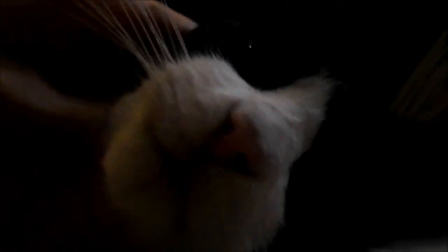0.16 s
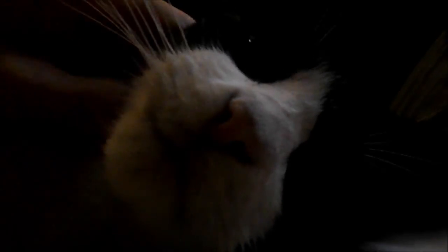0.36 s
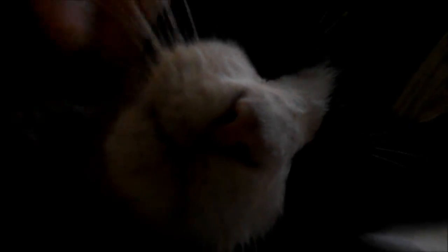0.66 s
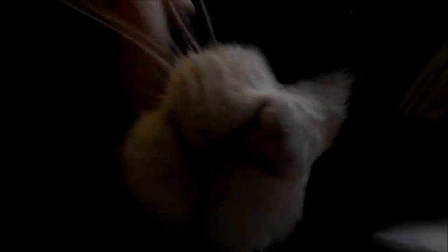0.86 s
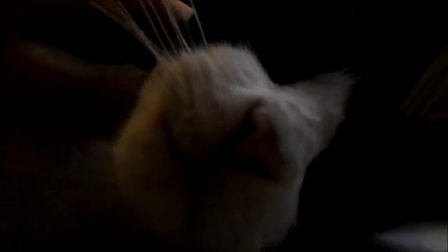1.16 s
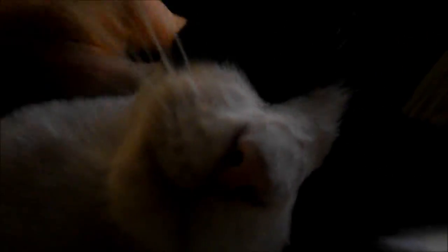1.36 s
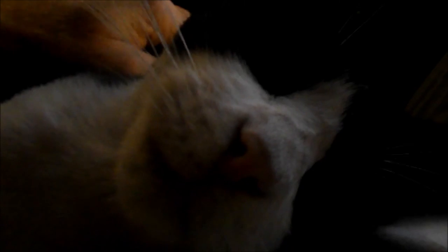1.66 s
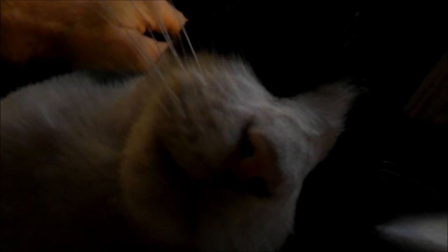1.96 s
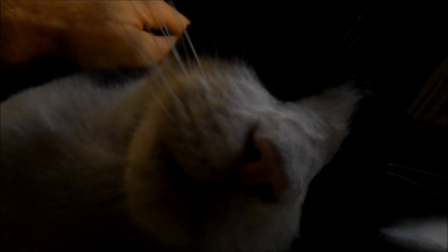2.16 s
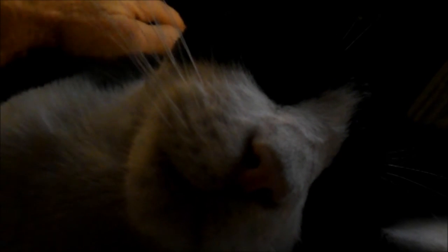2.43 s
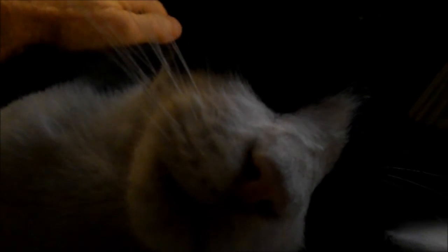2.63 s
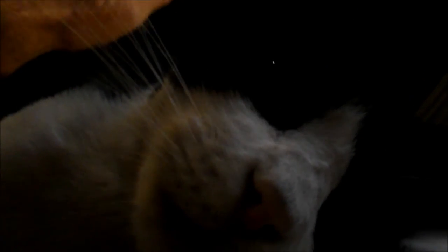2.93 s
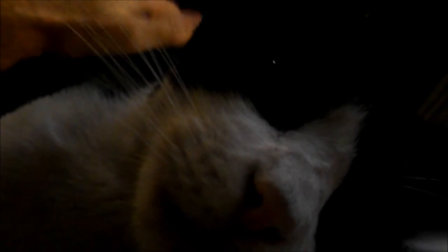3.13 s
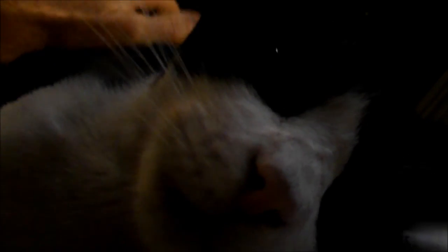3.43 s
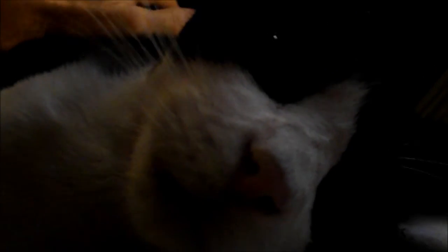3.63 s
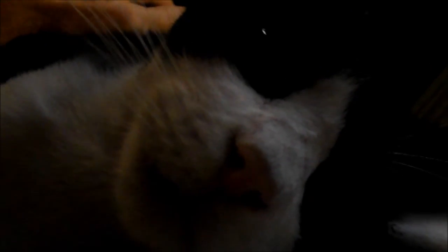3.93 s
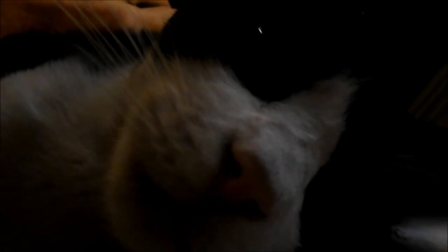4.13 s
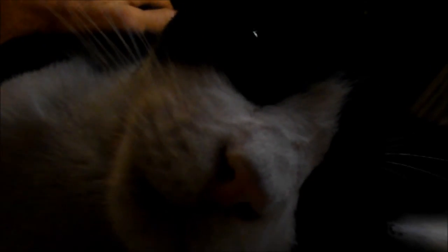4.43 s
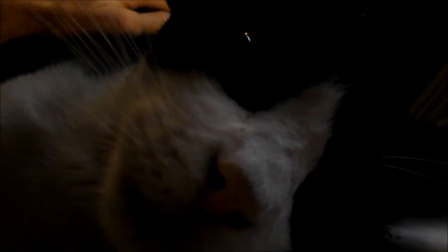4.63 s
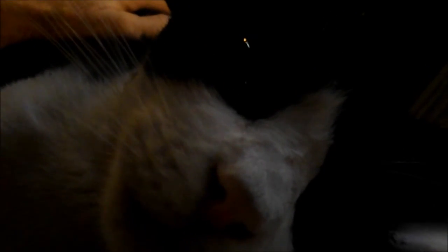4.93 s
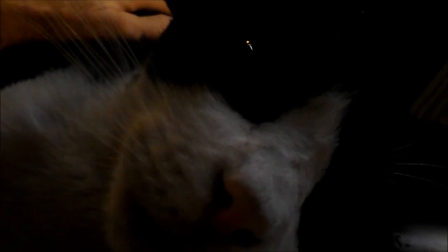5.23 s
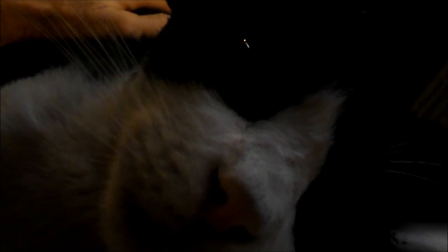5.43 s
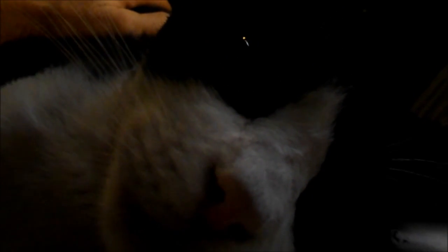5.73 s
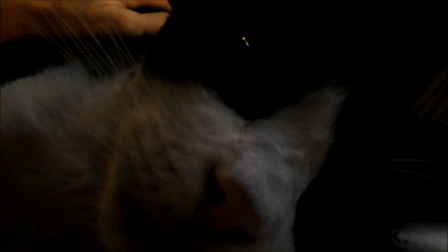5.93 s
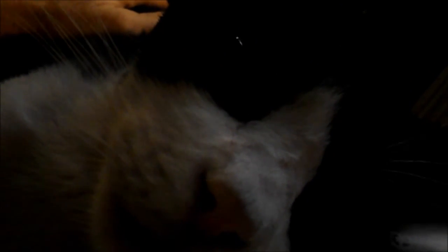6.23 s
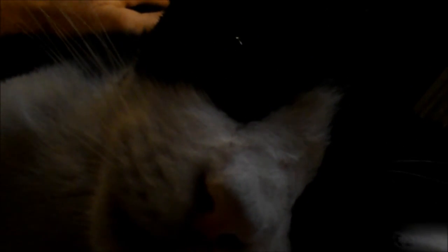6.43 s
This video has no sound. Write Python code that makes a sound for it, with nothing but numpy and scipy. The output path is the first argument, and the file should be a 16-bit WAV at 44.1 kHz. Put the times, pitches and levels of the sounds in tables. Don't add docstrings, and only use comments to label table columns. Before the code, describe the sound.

Steady purring from a relaxed cat, heard up close and dry. It starts at the end of an out-breath, then cycles between inhaling and exhaling, roughly one full breath every two seconds. Each change of direction brings a short burst of hard, ticking throat pulses, followed by a softer, uneven flutter with breathy fizz that dies down. The indoor background is only a low hum and soft hiss, recorded in mono.

```python
import sys
import numpy as np
from scipy import signal
from scipy.fft import rfft, irfft
from scipy.io import wavfile
from scipy.ndimage import uniform_filter1d

SR = 44100
rng = np.random.default_rng(int(sys.argv[2]) if len(sys.argv) > 2 else 0)


def pcm_store(signal):
    levels = np.round(np.clip(np.atleast_2d(signal), -1, 1) * 32767)
    wavfile.write(sys.argv[1], SR, levels.astype(np.int16).T)


def voltage_ratio(decibels):
    exponent = np.asarray(decibels, float) / 20
    return 10 ** exponent


N = 290574

# first puff in seconds, last puff in seconds, number of puffs,
# open share of the cycle (0-1).
RUNS = [
    (.010, .133, 4, .55),
    (.441, .523, 3, .35),
    (1.113, 1.807, 18, .65),
    (2.155, 2.237, 3, .3),
    (2.924, 3.614, 18, .65),
    (3.885, 4.020, 4, .22),
    (4.196, 4.236, 2, .2),
    (4.704, 5.528, 21, .65),
    (5.790, 6.046, 7, .4),
    (6.514, 6.594, 3, .55),
]
# hiss in dB at first and last,
# palate share in dB, rumble in dB at first and last.
FLOW = [(-62, -65.5, -4.5, -47, -61), (-65, -59, 1.5, -55, -60.5), (-63, -63, -3, -49.5, -58),
        (-58.5, -56.5, -8, -52, -53), (-60, -63.5, -15, -53, -59.5), (-63, -52, -14, -58.5, -51),
        (-57.5, -73, -5, -52, -63), (-62, -63.5, -8.5, -48, -61.5), (-54, -61.5, -12, -53.5, -64.5),
        (-60, -53, -17, -50, -49)]
# frequency in Hz, width in Hz, level in dB.
THROAT = [(221.4, 43, -3.5), (357, 340, -1.5), (541.7, 88, 2.5), (923, 170, -0.5), (1610, 740, -10)]
CLOSING_MS = (0.13, 0.11)


def rms_one(x):
    return x / np.sqrt(np.mean(x ** 2) + 1e-20)


def resonate(x, modes):
    out = 0
    for hz, width_hz, level_db in modes:
        r = np.exp(-np.pi * width_hz / SR)
        b = [(1 - r * r) / 2, 0, (r * r - 1) / 2]
        a = [1, -2 * r * np.cos(2 * np.pi * hz / SR), r * r]
        out = out + voltage_ratio(level_db) * signal.lfilter(b, a, x + 1e-18)
    return out


def add(track, sound, s, level_db):
    at = round(s * SR)
    part = sound[:N - at]
    track[at:at + len(part)] += part * voltage_ratio(level_db) / np.abs(sound).max()


def inward(s):
    turns = [
        .2,
        .9,
        1.87,
        2.6,
        3.7,
        4.4,
        5.54,
        6.4,
    ]
    return np.searchsorted(turns, s) % 2


def room():
    # frequency in Hz, density in dB per Hz.
    floor = [(20, -23), (40, -16), (70, -10.5), (90, -13.5), (140, -8.5), (220, -2), (330, -8), (450, -8),
             (680, -15), (1500, -19), (2300, -21.5), (6000, -19.5), (9700, -21.5), (11500, -22.5)]
    # frequency in Hz, wander in Hz, rms level in dB.
    hum = [(54, 1.8, -70.5), (117.7, 4.7, -70)]
    floor_hz, floor_db = np.transpose(floor)
    hz = np.maximum(np.fft.rfftfreq(N, 1 / SR), 10)
    shape = voltage_ratio(np.interp(np.log(hz), np.log(floor_hz), floor_db))
    out = voltage_ratio(-54.5) * rms_one(irfft(rfft(rng.standard_normal(N)) * shape, N))
    for hum_hz, wander_hz, level_db in hum:
        pitch, swell = (rms_one(uniform_filter1d(uniform_filter1d(n, size=2000), size=2000))
                        for n in rng.standard_normal((2, N)))
        tone = np.sin(2 * np.pi * np.cumsum(hum_hz + wander_hz * pitch) / SR)
        out += voltage_ratio(level_db) * rms_one(voltage_ratio(swell) * tone)
    return out


def opening():
    out, t = np.zeros(N), np.arange(N) / SR
    for first, last, puffs, share in RUNS:
        cycle = (t - first) * (puffs - 1) / (last - first)
        number = np.clip(np.round(cycle).astype(int), 0, puffs - 1)
        size, shift = rng.standard_normal((puffs, 2))[number].T
        along = np.clip((cycle - number + .04 * shift) / share + .54, 0, 1)
        out += np.sin(np.pi * along ** 1.4) * voltage_ratio(1.5 * size)
    return out


def flow_in_time():
    rise_db_per_s, fall_db_per_s = (250, 65), 260
    arch_db, palate_fade_db_per_s = 4.5, 11.5
    t = np.arange(N) / SR
    ends = np.array(RUNS)[:, :2].ravel()
    flow = np.array(FLOW)
    rumble = arch = 0
    for (first, last), (first_db, last_db) in zip(ends.reshape(-1, 2), flow[:, 3:]):
        before_db = rise_db_per_s[inward(first)] * np.maximum(first - t, 0)
        after_db = fall_db_per_s * np.maximum(t - last, 0)
        inside_db = np.interp(t, [first, last], [first_db, last_db])
        rumble = rumble + voltage_ratio(inside_db - before_db - after_db)
        arch = arch + (last - first) * np.sin(np.pi * np.clip((t - first) / (last - first), 0, 1))
    hiss_db = np.interp(t, ends, flow[:, :2].ravel()) + arch_db * arch
    since_first = ends - np.repeat(ends[::2], 2)
    palate_db = np.repeat(flow[:, 2], 2) - palate_fade_db_per_s * since_first
    return voltage_ratio(hiss_db), voltage_ratio(np.interp(t, ends, palate_db)), rumble


def airflow():
    # frequency in Hz, width in Hz, level in dB.
    nostril_modes = [(5300, 1900, -15), (6276, 490, 2), (7040, 240, -2.5), (8280, 480, -10.5)]
    palate_modes = [(3250, 270, -21), (3980, 150, 6), (4590, 530, -4.5)]
    chest_modes = [(193, 37, 0), (290, 164, -6), (503, 106, 0.5), (918, 55, -9)]
    hiss_gain, palate_share, rumble_gain = flow_in_time()
    gate = opening()
    gusts = voltage_ratio(2.3 * rms_one(uniform_filter1d(rng.standard_normal(N), size=60)))
    air = rng.standard_normal(N) * gusts
    hiss = rms_one(resonate(air, nostril_modes)) + palate_share * rms_one(resonate(air, palate_modes))
    lumps = voltage_ratio(4 * rms_one(uniform_filter1d(rng.standard_normal(N), size=150)))
    rumble = rms_one(resonate(rng.standard_normal(N) * lumps, chest_modes))
    rumble = rumble * (.4 + np.roll(gate, 300))
    rumble = signal.sosfilt(signal.butter(2, 1400, fs=SR, output="sos"), rumble)
    return voltage_ratio(6.0) * hiss_gain * hiss * gate + voltage_ratio(0.5) * rumble_gain * rumble


def murmurs():
    murmur_hz, over_rumble_db = (207.5, 530), (7, 4)
    early_s, answer_s = 0.00195, .019
    echo_s, echo_db = .017, -24
    rows = [(s + echo_s, level_db + echo_db, murmur_hz[1]) for s, level_db, *_ in opening_closures()]
    for (first, last, puffs, _), (*_, first_db, last_db) in zip(RUNS, FLOW):
        for k in range(2 - inward(first)):
            size, tune, shift = rng.standard_normal((puffs, 3)).T
            s = np.linspace(first, last, puffs) - early_s + k * answer_s + 0.002805 * shift
            level_db = np.linspace(first_db, last_db, puffs) + over_rumble_db[k] + 2 * size
            rows += zip(s, level_db, murmur_hz[k] * (1 + 0.075 * tune))
    return rows


def flutters():
    # start in seconds, peak in dB, pitch in Hz, length in ms.
    strong = [(.012, -35, 517, 7.9), (.06, -43, 517, 7.9), (.097, -37.5, 500, 6.9), (.269, -31.5, 544, 5.1),
              (.314, -34, 586, 7), (1.077, -31.5, 404, 9.6), (1.121, -33.5, 536, 6.1),
              (1.451, -45, 210, 8.9), (1.488, -42, 503, 5.2), (1.771, -42, 481, 3.9),
              (1.941, -35.5, 505, 6.8), (2.027, -41.5, 523, 4.3), (2.181, -42.5, 188, 15.5),
              (2.276, -44, 222, 12.4), (2.85, -34.5, 393, 4.8), (2.889, -31.5, 553, 5.9),
              (3.09, -32.5, 566, 1.8), (3.168, -39.5, 575, 4.3), (3.331, -40, 178.5, 6.2),
              (3.623, -40.5, 194.5, 5), (3.752, -38.5, 587, 7.7), (4.661, -39, 563, 6.6),
              (4.714, -32, 580, 5.7), (4.798, -45, 514, 7.8), (4.833, -41.5, 229.7, 7.9),
              (4.857, -37, 530, 2.3), (5.159, -40, 197.5, 5.5), (5.394, -43, 261, 3.2),
              (6.04, -42.5, 214, 6.1), (6.565, -29, 549, 3.6)]
    rest_s = .012
    busy = np.array([row[0] for row in strong] + [row[0] for row in catch_closures()])
    rows = list(strong)
    for s, level_db, hz in murmurs():
        if 0 < s < N / SR - .01 and np.abs(busy - s).min() > rest_s:
            rows.append((s, level_db, hz, 3 + 1000 * 1.3 / hz))
    return rows


def throbs():
    out, t = np.zeros(N), np.arange(2600) / SR
    rows = flutters()
    dull = signal.butter(4, 1050, fs=SR, output="sos")
    for (s, level_db, hz, length_ms), noise in zip(rows, rng.standard_normal((len(rows), len(t)))):
        swell = np.sin(np.pi * np.clip(t / (max(length_ms, 1) / 1000), 0, 1))
        rough = 0.71 * hz / 500 * rms_one(signal.sosfilt(dull, noise))
        flutter = np.sin(2 * np.pi * hz * t + noise[0]) + rough
        add(out, resonate(flutter * swell, THROAT[:4]), s, level_db + 6.0)
    return out


def catch_closures():
    # start in seconds, peak in dB, brightness in dB, chest share in dB.
    catches = [(.015, -47, -27, 2.5), (.095, -35.5, -6, 11), (.647, -37.5, -2, 10), (1.156, -31, -8.5, -3),
               (1.207, -40, -11, 5), (1.237, -35.5, -26, -3), (1.276, -33.5, -30, 4), (1.437, -35, -21, -2),
               (1.565, -34, -21, -2), (1.597, -35.5, -17, .6), (1.643, -32.5, -27, -11),
               (2.97, -34.5, -22, 20), (3.007, -32, -25, 4), (3.045, -31, -17, 9), (3.082, -27, -12, -7),
               (3.118, -32, -11, 2), (3.164, -29, -8.5, .6), (3.324, -36.5, -10, -13), (3.963, -35, -2, 0),
               (4.018, -38, -18, -8), (4.184, -37, -9, -6), (4.872, -29.5, -13, .6),
               (4.997, -30.5, -13, -4), (5.081, -34, -21, 6), (5.203, -32, -18, 2), (5.241, -27, -9.5, -3),
               (6.015, -37.5, -9, -1), (6.228, -35.5, -7, -4), (6.565, -33, -14, 3)]
    return [(s, level_db, bright_db, 1.18 * CLOSING_MS[inward(s)], chest_db)
            for s, level_db, bright_db, chest_db in catches]


def opening_closures():
    # first in seconds, last in seconds, peak in dB at first, middle and last.
    openings = [
        (.254, .334, -31.5, -30.5, -25),
        (1.07, 1.141, -29.5, -24.5, -27),
        (1.93, 2.004, -27, -25.5, -27),
        (2.804, 2.916, -28, -34, -25),
        (3.743, 3.82, -26, -23.5, -24),
        (4.655, 4.732, -27.5, -23, -26),
        (5.567, 5.689, -28, -27.5, -26),
        (6.507, 6.583, -23.5, -21.5, -24),
    ]
    bright_db, chest_db = (-10.5, -8.5), (-2, -3.2)
    cycle_s = .039
    rows = []
    for first, last, *levels_db in openings:
        way = inward(first)
        times = np.linspace(first, last, round((last - first) / cycle_s) + 1)
        peaks_db = np.interp(times, [first, (first + last) / 2, last], levels_db)
        rows += [(s, level_db, bright_db[way], CLOSING_MS[way], chest_db[way])
                 for s, level_db in zip(times, peaks_db)]
    return rows


def scattered(modes, chance, spread_db):
    return [(hz, width, level + spread_db * c) for (hz, width, level), c in zip(modes, chance)]


def snaps():
    # frequency in Hz, width in Hz, level in dB.
    nose_modes = [(3480, 920, -2.5), (3750, 1700, -7), (6220, 500, 7.5), (7250, 320, -6), (8500, 590, -21)]
    out, click, t = np.zeros(N), signal.unit_impulse(2600), np.arange(2600) / SR
    rows = opening_closures() + catch_closures()
    chance = rng.standard_normal((len(rows), 11))
    for (s, level_db, bright_db, soft_ms, chest_db), c in zip(rows, chance):
        sign = 1 - 2 * inward(s)
        throat, nose = scattered(THROAT, c, 2), scattered(nose_modes, c[5:], 3)
        push = t * np.exp(-1000 * t / max(soft_ms, .02))
        chest = voltage_ratio(chest_db + 3 * c[10]) * resonate(push, throat[:2])
        body = resonate(push, throat[2:]) + chest
        add(out, sign * body, s + 0.00116, level_db + 2.5)
        add(out, sign * resonate(click, nose), s + 0.001318, level_db + bright_db + 5.5)
    return out


def cat():
    # frequency in Hz, width in Hz.
    valleys = [(780, 363), (2700, 200)]
    x = airflow() + throbs() + snaps()
    for hz, width_hz in valleys:
        x = 0.15 * x + 0.87 * signal.lfilter(*signal.iirnotch(hz, hz / width_hz, fs=SR), x)
    x = signal.sosfilt(signal.butter(2, 130, "high", fs=SR, output="sos"), x)
    return signal.sosfilt(signal.butter(8, 9400, fs=SR, output="sos"), x)


def scene():
    return np.tile(room() + cat(), (2, 1))


def low_pass(x):
    return signal.sosfilt(signal.butter(12, 11350, fs=SR, output="sos"), x)


def record(dry):
    notch_hz, notch_width_hz = 7660, 220
    b, a = signal.iirnotch(notch_hz, notch_hz / notch_width_hz, fs=SR)
    x = 0.26 * dry + 0.72 * signal.lfilter(b, a, dry)
    x = signal.sosfilt(signal.cheby1(8, 1, 10340, fs=SR, output="sos"), x)
    return low_pass(x)


dry = scene()
out = record(dry)
pcm_store(out)
```